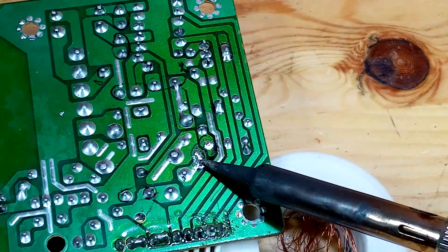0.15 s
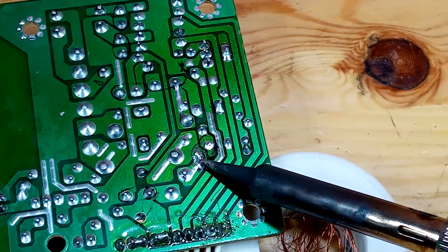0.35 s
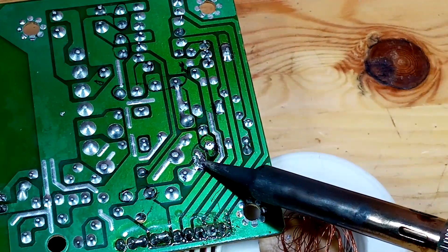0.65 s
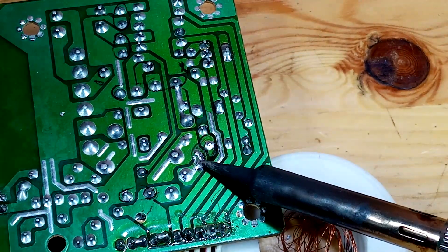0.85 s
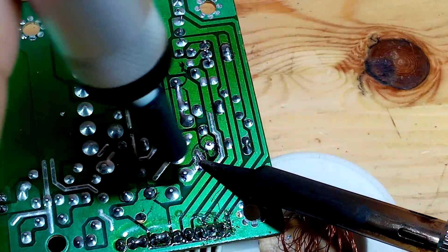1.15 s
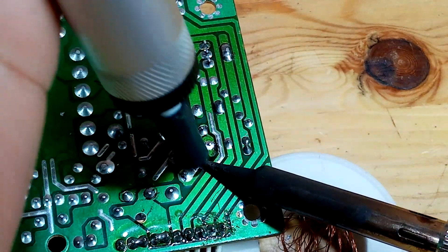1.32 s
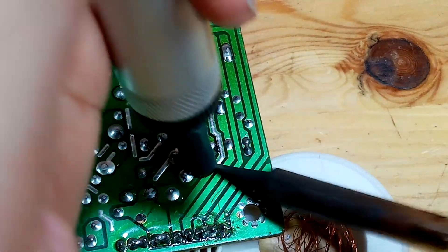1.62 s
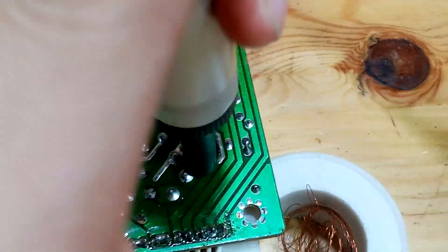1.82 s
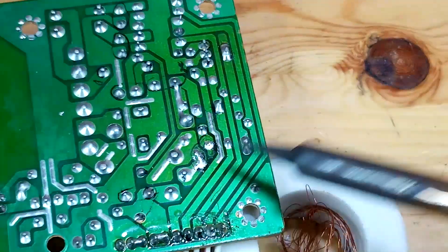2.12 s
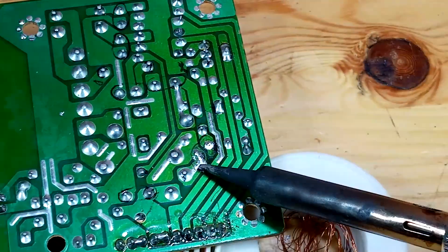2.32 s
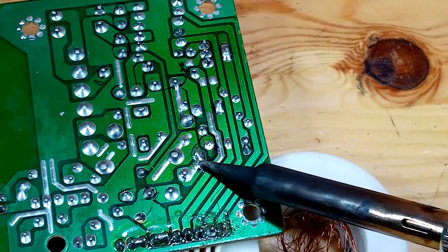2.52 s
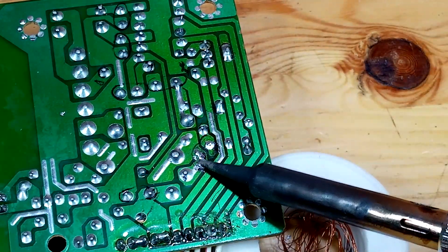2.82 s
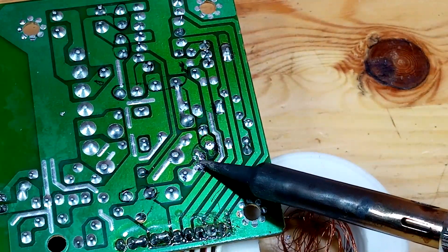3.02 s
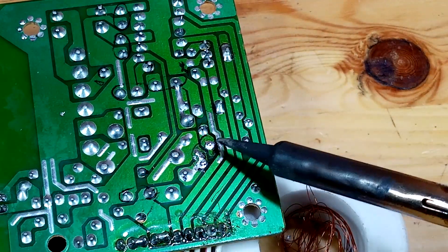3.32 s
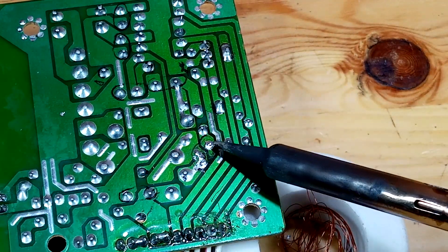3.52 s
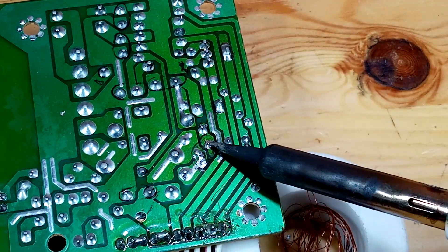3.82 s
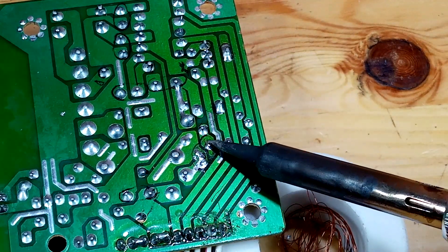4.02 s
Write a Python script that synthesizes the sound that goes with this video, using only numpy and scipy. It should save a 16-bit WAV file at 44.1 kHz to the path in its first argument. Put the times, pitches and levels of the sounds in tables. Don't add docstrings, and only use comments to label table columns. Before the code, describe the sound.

A hand-worked solder sucker above a wooden bench, heard close and dry with a little room echo: ticking slide and metallic latch click, near quiet, tiny scrapes, then the loud spring shot as two cracks almost fused together. A gentler push and latch follow, then a faint tap of the iron on the board. Soft rustles, dull distant rumble and a steady low hum lie beneath.

```python
import sys
import numpy as np
from scipy import signal
from scipy.io import wavfile
from scipy.ndimage import uniform_filter1d

SR = 44100
rng = np.random.default_rng(int(sys.argv[2]) if len(sys.argv) > 2 else 0)


def convert_level_to_amplitude(level_db):
    exponent = np.asarray(level_db, float) / 20
    return 10 ** exponent


def wrap_up_sound(samples):
    columns = np.atleast_2d(samples).T
    tamed = np.clip(columns, -1, 1)
    steps = np.round(tamed * 32767).astype(np.int16)
    wavfile.write(sys.argv[1], SR, steps)


N = 183279

# f/Hz, level/dB per Hz
SNAP_BODY = [(70, -60.5), (180, -38.5), (400, -24), (1000, -25.5), (2200, -15.5), (3200, -9), (6000, -13),
             (9000, -9.5), (12000, -11.5), (14800, -11), (15700, -18), (16700, -32.5)]
# f/Hz, width/Hz, lift/dB
SNAP_MODES = [(2830, 130, 8), (3050, 120, 8), (3400, 100, 2), (3750, 300, -18), (4450, 200, 3),
              (6100, 200, -7), (7800, 1200, 3), (10350, 520, 15), (11800, 300, 3), (13650, 240, 15)]


def evened(x):
    return x / np.sqrt(np.mean(x ** 2) + 1e-20)


def read(points, hz):
    f, value = np.transpose(points)
    return np.interp(np.log(hz + 1), np.log(f + 1), value)


def add(mix, s, sound):
    part = mix[..., round(s * SR):][..., :sound.shape[-1]]
    part += sound[..., :part.shape[-1]]


def body(points, modes, size=2048):
    hz = np.abs(np.fft.fftfreq(size, 1 / SR))
    db = read(points, hz)
    for f, width, lift_db in modes:
        db = db + lift_db / (1 + (2 * (hz - f) / width) ** 2)
    log_gain = np.log(convert_level_to_amplitude(np.maximum(db, -100)))
    taps = np.fft.ifft(np.exp(signal.hilbert(log_gain).conj())).real
    return taps / np.linalg.norm(taps)


def resonate(x, hz, width):
    turn = np.exp(2j * np.pi * hz * np.arange(len(x)) / SR)
    r = np.exp(-np.pi * width / SR)
    smooth = signal.lfilter([1], np.convolve([1, -r], [1, -r]), x / turn)
    return evened((turn * smooth).real)


def drift(seconds):
    span = int(seconds * SR)
    return evened(uniform_filter1d(uniform_filter1d(rng.standard_normal(N), span), span))


def rattle(db, length_ms, rise_ms, room_db, taps, ringing):
    ms = np.arange(1200) * 1000 / SR
    force = (1 - np.exp(-ms / rise_ms)) * np.exp(-(ms / length_ms) ** 2.2)
    contacts = force * rng.standard_normal(len(ms))
    direct = np.convolve(contacts / np.linalg.norm(contacts), taps)
    blow = np.pad(ringing, (0, len(ms) - 1)) * convert_level_to_amplitude(room_db)
    return convert_level_to_amplitude(db) * np.linalg.norm(force) * np.array([direct, blow])


def knock(hz, db, t60):
    t = np.arange(SR // 2) / SR
    builds = 1 - np.exp(-2.5 * hz * t)
    ring = convert_level_to_amplitude(db - 60 * t / t60) * builds * np.sin(2 * np.pi * hz * t)
    room_db = -4 - 10 * np.log10(t60 * 100)
    return ring * convert_level_to_amplitude([[0], [room_db]])


def stroke(rows, taps, grain_db):
    s, db = np.transpose(rows)
    t = np.arange(s[0], s[-1], 1 / SR)
    grains = convert_level_to_amplitude(grain_db * evened(uniform_filter1d(rng.standard_normal(len(t)), 90)))
    rub = np.convolve(grains * rng.standard_normal(len(t)), taps)[:len(t)]
    return s[0], convert_level_to_amplitude(np.interp(t, s, db)) * evened(rub) * signal.windows.tukey(len(t), .08)


def puff(s, length, db, hz, width):
    noise = rng.standard_normal(9000)[:int(length * 1.4 * SR)]
    return s - length * 0.62, convert_level_to_amplitude(db) * resonate(noise, hz, width) * np.hanning(len(noise))


def spring_snaps(hits):
    # t/s, peak level/dB, rattle length/ms, rise/ms, room level/dB
    snaps = [
        (1.6947, -17, 4.1, .31, -7.5),
        (1.7025, -26, 6, 1.5, -9.5),
        (1.7090, -17, 4.6, 1.2, -5.5),
    ]
    for s, *blow in snaps:
        ring = .3 + 42 * (s - snaps[0][0])
        taps = body(SNAP_BODY, np.multiply(SNAP_MODES, [1, 1, ring]))
        add(hits, s, rattle(*blow, taps, body(SNAP_BODY, SNAP_MODES)))


def air_pops(hits):
    # t/s, peak level/dB, width/ms, undershoot/0-1
    pops = [
        (1.6953, -18, .13, 1.),
        (1.6963, -19, .2, 1.),
        (1.70915, -15, .17, .7),
    ]
    for s, db, width_ms, undershoot in pops:
        u = (np.arange(88) - 44) * 1000 / SR / width_ms
        pop = convert_level_to_amplitude(db) * (1 - undershoot * u ** 2) * np.exp(-u ** 2 / 2)
        add(hits, s - 44 / SR, pop * convert_level_to_amplitude([[0], [-14]]))


def shivering_spring(rubs):
    top_s, top_db = 1.742, -32
    shape = [(-.024, -18), (0, 0), (.23, -54)]
    add(rubs, *stroke(np.add(shape, [top_s, top_db]), body(SNAP_BODY, SNAP_MODES), grain_db=1.8))


def latches(hits):
    # t/s, peak level/dB, rattle length/ms, rise/ms, room level/dB
    blows = [
        (0.3133, -20, 4.9, .59, -10),
        (.4050, -36, 7.4, 2.45, -10.5),
        (2.5120, -24, 4.2, 0.44, -7),
        (2.601, -39, 8.4, .63, -10),
    ]
    # f/Hz, level/dB per Hz
    tone = [(300, -34), (1000, -27), (2000, -30), (2900, -27.5), (3900, -9), (5200, -3.5), (7400, -7),
            (13300, -7), (15700, -15.5), (16700, -30)]
    # f/Hz, width/Hz, lift/dB
    modes = [(3540, 200, 4.5), (4450, 490, 10.5), (4890, 300, 6), (5400, 100, 2.5), (6300, 320, 2),
             (7800, 190, 2.5), (9684, 500, 7.5), (11860, 900, -2), (13300, 400, 3)]
    # f/Hz, level against the blow/dB, time to die by 60 dB/s
    ring_hz, under_db, ring_t60 = (4380, -7, .03)
    taps = body(tone, modes)
    for s, db, length_ms, rise_ms, room_db in blows:
        add(hits, s, rattle(db, length_ms, rise_ms, room_db, taps, taps))
        add(hits, s + rise_ms / 500, knock(ring_hz, db + under_db, ring_t60))


def ticks(hits):
    # t/s, peak level/dB, main ring f/Hz, rattle length/ms, room level/dB
    events = [(0.148, -58.5, 5340, 4.3, -12), (0.1592, -56, 5160, 5, -2), (0.2153, -53, 3640, 3.4, -13),
              (0.2764, -45, 9850, 1.5, -10), (.2884, -51, 4450, 3, -15), (1.5787, -64, 7000, 3, -4),
              (1.5944, -66.5, 5530, 2.5, -9.5), (1.6086, -49, 8360, 2.6, -5),
              (1.6095, -48.5, 4300, 3.5, -9), (1.611, -44.5, 2400, 2.7, -9),
              (1.6765, -51.5, 6800, 1.26, -13.5), (2.2987, -62.5, 10300, 2.1, 0),
              (2.2985, -67, 3298, 2.5, -15), (2.325, -49, 5160, 3.8, -9), (2.325, -53.5, 6910, 4.7, -5),
              (2.40, -64, 3400, 2, -10), (3.9305, -49, 9680, 1.8, -17), (3.93, -55.5, 2980, 3, -4.5),
              (3.932, -53, 6900, 2, -12), (4.1431, -64.5, 9000, 2.1, -9.5)]
    # f/Hz, level/dB
    tone = [(300, -26.5), (1500, -8.5), (3000, -9), (6000, -1), (10000, 1), (14000, -6.5), (15700, -10),
            (16500, -31.5)]
    ring_db, width_hz = 15.5, 800
    for s, db, hz, length_ms, room_db in events:
        bright_db = -4 + 14 * np.log2(hz / 1e4)
        modes = [(hz, width_hz, ring_db),
                 (hz * 1.3, width_hz, ring_db / 2),
                 (14000, 16000, bright_db)]
        taps = body(tone, modes)
        add(hits, s, rattle(db, length_ms, 0.59, room_db, taps, taps))


def knocks(hits):
    # t/s, f/Hz, level/dB, time to die by 60 dB/s
    events = [(.2158, 4450, -51, .02), (.314, 45, -65, .05), (.3145, 1100, -59, .012),
              (.4092, 1000, -35, .007), (.409, 2300, -52, .006), (1.57, 270, -60, .1),
              (1.6097, 650, -54, .035), (1.61, 1100, -55, .012), (1.61, 1700, -55, .012),
              (1.694, 118, -37, .07), (1.696, 10200, -24, .015), (1.7108, 2900, -30.5, .008),
              (1.715, 2960, -52, .4), (1.7102, 13680, -22, .035), (1.707, 250, -36.5, .06),
              (1.714, 182.5, -42.5, .48), (2.30, 230, -59, .17), (2.38, 215, -57.5, .12),
              (2.39, 100, -64, .15), (2.5125, 1900, -60, .008), (2.5125, 480, -54, .015),
              (2.6055, 950, -41, .01), (2.605, 1600, -50, .006), (2.605, 2400, -54, .006),
              (3.57, 1250, -71, .055), (3.9315, 240, -51, .094), (3.934, 170, -57, .096),
              (3.933, 1250, -54, .05), (3.932, 1850, -61, .02), (3.931, 3250, -53, .012)]
    for s, hz, db, t60 in events:
        add(hits, s, knock(hz, db, t60))


def slides(rubs):
    strokes = [
        (.147, .165, -70, 5.5),
        (1.572, .04, -74, 2),
        (1.606, .05, -58.5, -8),
        (1.652, .04, -63, -3),
        (1.93, .21, -79, -4),
        (2.318, .192, -70.5, 2.5),
    ]
    parts = [0, 1, 1, 1, 2, 3]
    # f/Hz, level/dB per Hz
    colours = [
        [(800, -30), (2400, -19), (3500, -9), (4500, 2), (6200, -3), (9800, -0.5), (13300, -6), (16000, -13)],
        [(300, -12), (800, -6.5), (2300, 3.5), (4200, -6.5), (6000, -9), (10300, -10), (13300, -14.5),
         (16000, -24.5)],
        [(300, 1), (1000, 1.5), (3000, -5.5), (5600, -6.5), (10300, -0.5), (12800, -8), (14000, -33.5)],
        [(800, -20), (2200, -24), (3500, -6.5), (4400, -7.5), (6500, -3), (9800, -5), (14700, -6), (16000, -15)],
    ]
    # f/Hz, width/Hz, lift/dB
    barrel = [(3500, 250, 5), (4400, 250, 6), (5800, 200, -8), (6300, 250, 6), (8500, 300, 3),
              (9750, 300, 5)]
    for (s, length, db, swell_db), part in zip(strokes, parts):
        shape = [(0, -7.5), (.2, 0), (1 - .15, swell_db), (1, swell_db - 7)]
        rows = np.multiply(shape, [length, 1]) + [s, db]
        add(rubs, *stroke(rows, body(colours[part], barrel), grain_db=2.2))


def squeaks(rubs):
    events = [(0.205, 0.022, 6420, -68), (.218, 0.0078, 3470, -62), (.235, 0.029, 9850, -68.5),
              (1.569, .01, 7050, -72.5), (1.637, 0.007, 8600, -63), (1.64, .022, 4197, -60.5),
              (1.664, 0.02, 2366, -65), (2.363, 0.031, 6300, -80), (2.47, 0.076, 4420, -76)]
    for s, length, hz, db in events:
        add(rubs, *puff(s, length, db, hz, hz / 32))


def rustles(rubs):
    events = [(.795, .07, -88, -81, 12800), (.973, .078, -87, -89, 12900), (1.12, .07, -83, -90, 12380),
              (2.02, .12, -84, -97, 10310), (2.859, .066, -87.5, -86.5, 10200),
              (3.155, .12, -86, -90, 10600), (3.705, .1, -87, -85.5, 10400), (3.82, .027, -89, -83, 8610),
              (4.16, .1, -80, -93.5, 10380)]
    # f/Hz, width/Hz
    low_ring = (5660, 750)
    for s, length, ring_db, fizz_db, fizz_hz in events:
        add(rubs, *puff(s, length, ring_db, *low_ring))
        add(rubs, *puff(s, .8 * length, fizz_db, fizz_hz, width=1800))


def room(x):
    # f/Hz, time to die by 60 dB/s
    decay = [(60, .08), (200, 0.69), (1000, 0.16), (3000, .27), (8000, .265), (14000, 0.23)]
    hz, t, z = signal.stft(rng.standard_normal(SR // 2), SR, nperseg=256)
    fade = convert_level_to_amplitude(-60 * t / read(decay, hz)[:, None])
    tail = signal.istft(z * fade, SR, nperseg=256)[1]
    t = np.arange(len(tail)) / SR
    tail = tail * (1 - np.exp(-np.maximum(t - .004, 0) / .008))
    return signal.fftconvolve(x, tail / np.linalg.norm(tail))[:N]


def motor():
    motor_hz, throb_hz, throb_top_s = 73.6, 2.855, .12
    orders = [(1, -83, .68), (2, -70, .3), (3, -76, .1), (10, -92, .1), (15, -93, .1), (20, -88.5, .1),
              (24, -98, .1)]
    # t/s, level/dB
    hum_swell = [(0, -0.5), (.45, 1), (.8, -1.5), (1.2, -2), (1.9, 1), (2.6, -0.5), (3.2, -1), (4.16, -0.5)]
    # f/Hz, level/dB rms
    whines = [(5561, -103), (7655, -104), (9049, -102), (9932, -105), (10374, -105), (10449, -105),
              (10557, -106)]
    t = np.arange(N) / SR
    turns = np.cumsum(motor_hz * (1 + .001 * drift(.3))) / SR
    throb = np.cos(2 * np.pi * throb_hz * (t - throb_top_s))
    hum = np.zeros(N)
    for k, db, depth in orders:
        level = convert_level_to_amplitude(db + 3 + .8 * drift(.2)) * (1 + depth * throb)
        hum += level * np.sin(2 * np.pi * (k * turns + rng.random()))
    whine = sum(convert_level_to_amplitude(db) * resonate(rng.standard_normal(N), hz, 5.6) for hz, db in whines)
    return hum * convert_level_to_amplitude(np.interp(t, *np.transpose(hum_swell))) + whine


def rumble():
    # f/Hz, width/Hz, resting level/dB
    rings = [
        (391, 90, -86),
        (185, 30, -86),
    ]
    swells = [
        [(.14, .25, -70.5), (.44, .14, -70.5), (.78, .24, -68.5), (1.0, .14, -80), (1.75, .45, -73),
         (2.42, .22, -78.5), (2.95, .25, -82.5), (3.6, .4, -73), (4.14, .2, -81.5)],
        [(.02, .2, -85), (.5, .3, -73), (1.6, .14, -72), (1.8, .2, -66), (2.42, .3, -71), (2.75, .2, -75.5)],
    ]
    t = np.arange(N) / SR
    out = np.zeros(N)
    for (hz, width, rest_db), ring_swells in zip(rings, swells):
        level = convert_level_to_amplitude(rest_db)
        for s, length, db in ring_swells:
            level = level + convert_level_to_amplitude(db) * np.exp(-(3 * (t - s) / length) ** 2)
        out += level * resonate(rng.standard_normal(N), hz, width)
    return out


def air():
    # f/Hz, level/dB per Hz
    tone = [(25, -30), (55, -34), (70, -22.5), (110, -18), (150, -5.5), (266, -8), (450, -14), (1000, -20),
            (1250, -28), (2000, -31.5), (8600, -34), (11600, -36), (12100, -57.5), (16500, -67.5)]
    # f/Hz, width/Hz, lift/dB
    modes = [(1540, 210, 8), (5613, 500, 0), (7650, 200, 3.5), (9000, 150, 2.5), (10000, 550, 6),
             (10100, 660, 4)]
    # f/Hz, level/dB
    patchy = [(100, 2), (400, 3), (900, 2.8), (2000, 1.5)]
    frames, hz = N // 256 + 5, np.fft.rfftfreq(1024, 1 / SR)
    a, b, patches = rng.standard_normal((frames, 513, 3)).T
    patches = evened(uniform_filter1d(uniform_filter1d(patches, 3, 0), 16, 1))
    uneven = (a + 1j * b) * convert_level_to_amplitude(read(patchy, hz)[:, None] * patches)
    noise = signal.istft(uneven, nperseg=1024, noverlap=768)[1][:N]
    return convert_level_to_amplitude(-74.5) * evened(signal.fftconvolve(noise, body(tone, modes, size=8192))[:N])


def scene():
    hits = np.zeros((2, N))
    for strike in (spring_snaps, air_pops, latches, ticks, knocks):
        strike(hits)
    rubs = np.zeros(N)
    for rub in (shivering_spring, slides, squeaks, rustles):
        rub(rubs)
    direct, sent = hits
    sustained = signal.oaconvolve(room(sent) + rubs, signal.firwin(255, 15800, fs=SR), "same")
    return (direct + sustained + motor() + rumble() + air())[None]


def low_pass(x):
    return signal.sosfilt(signal.butter(12, 16910, fs=SR, output="sos"), x)


def record(dry):
    x = signal.sosfilt(signal.butter(2, 18, "high", fs=SR, output="sos"), dry)
    x = signal.oaconvolve(x, signal.firwin(255, 16750, window=("kaiser", 9), fs=SR)[None], "same")
    return low_pass(x)


dry = scene()
out = record(dry)
wrap_up_sound(out)
```